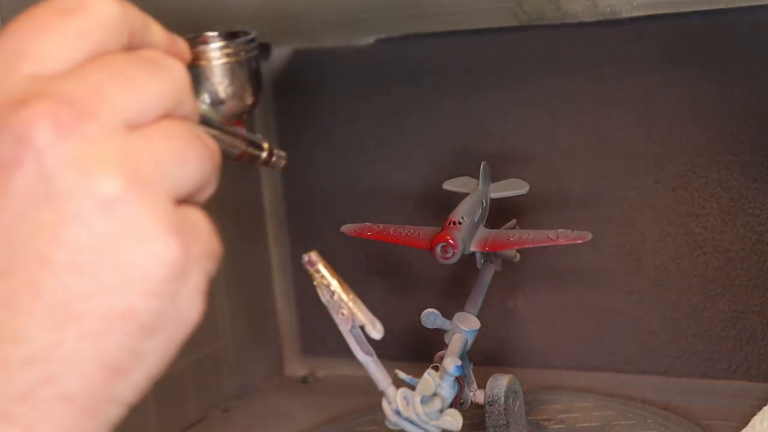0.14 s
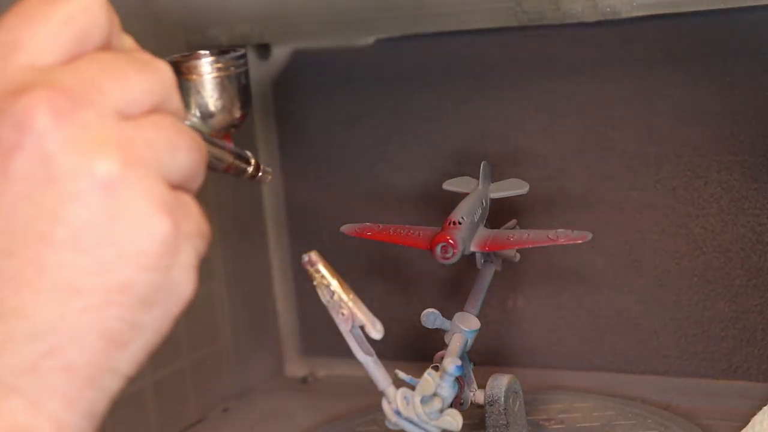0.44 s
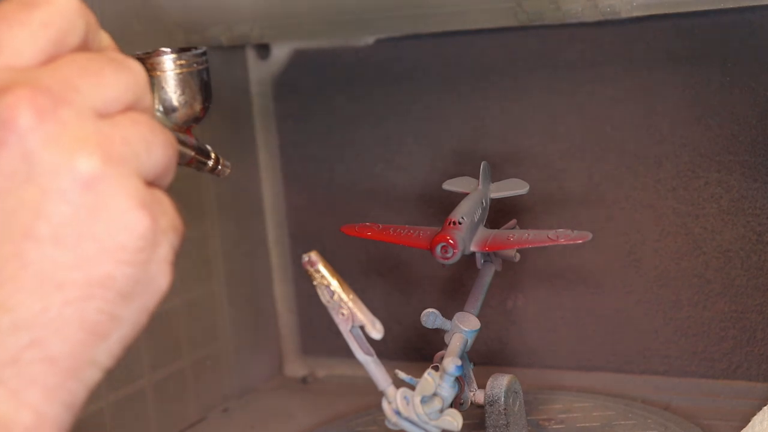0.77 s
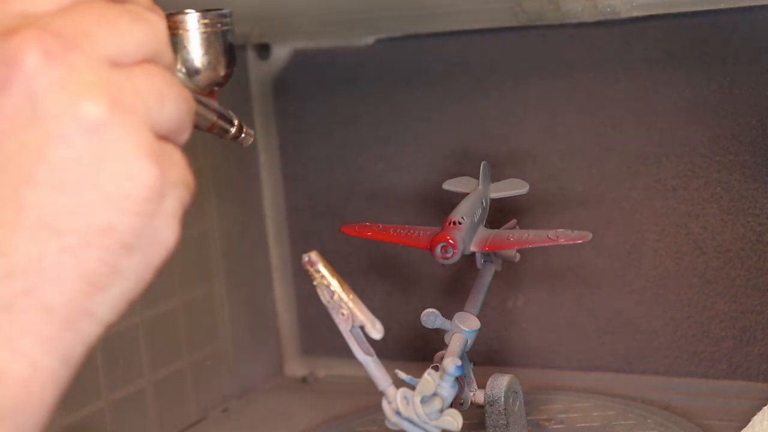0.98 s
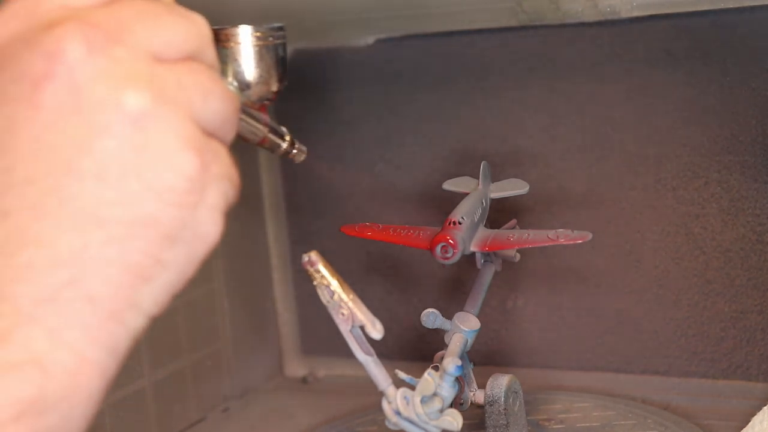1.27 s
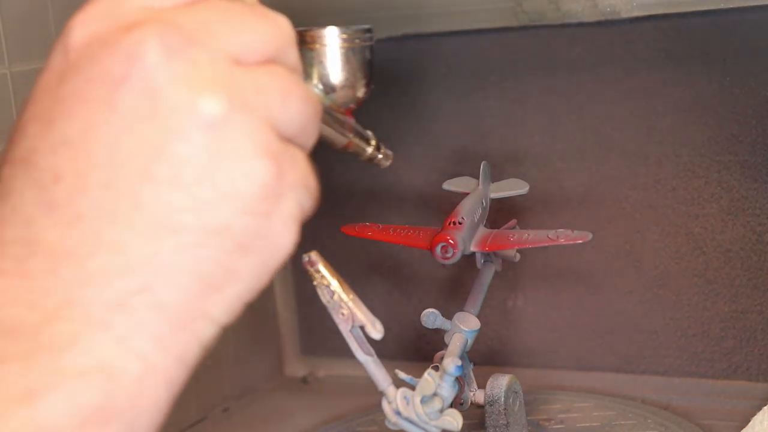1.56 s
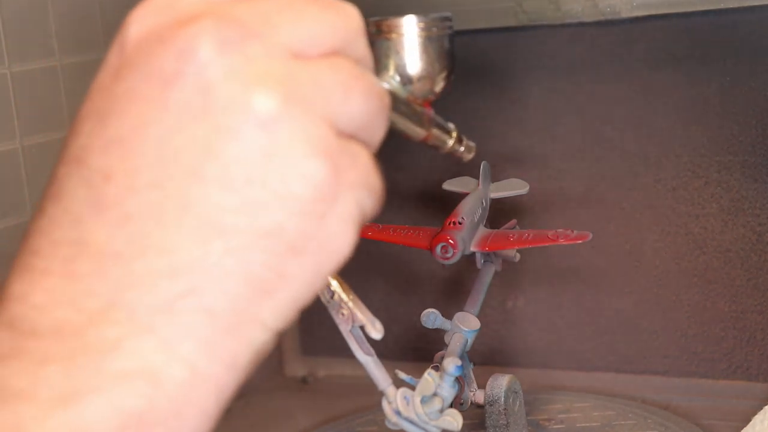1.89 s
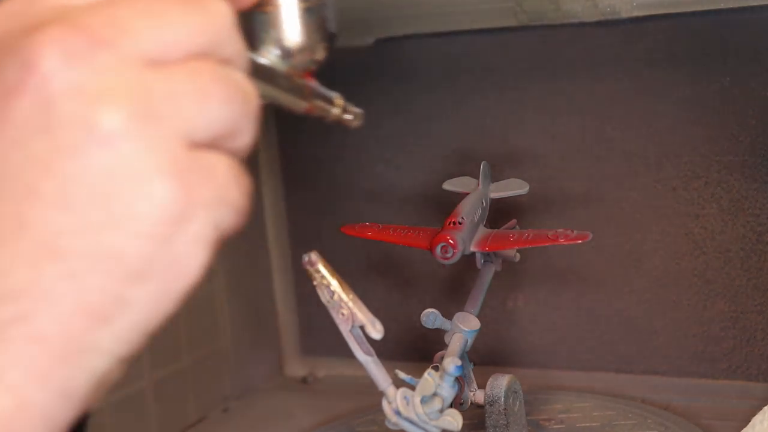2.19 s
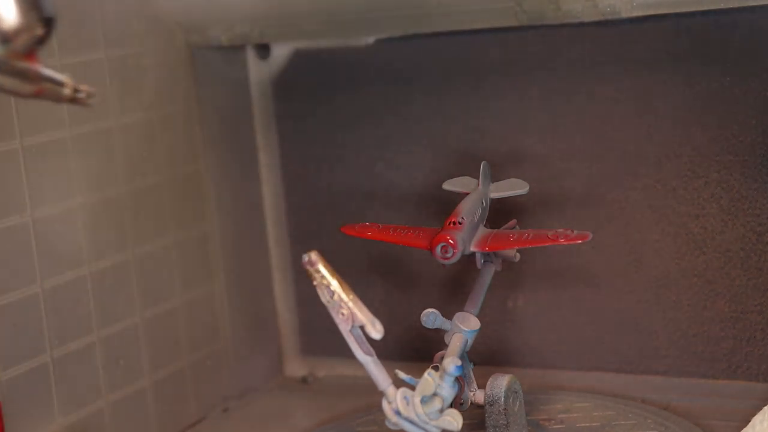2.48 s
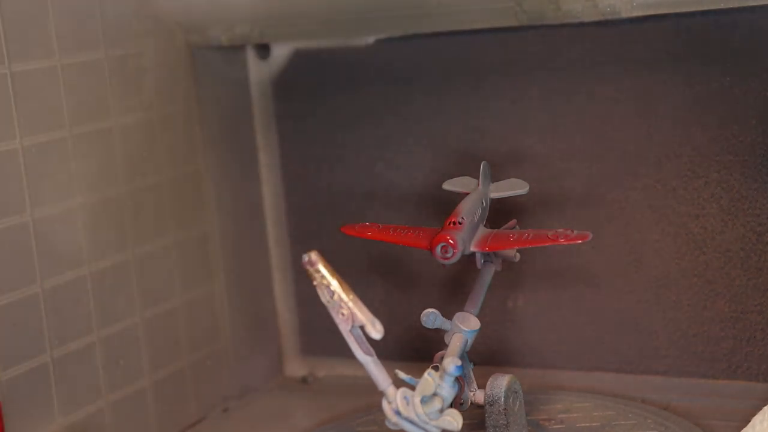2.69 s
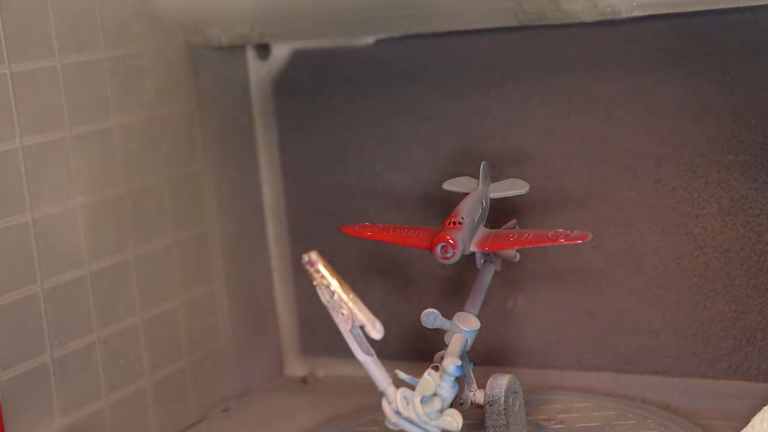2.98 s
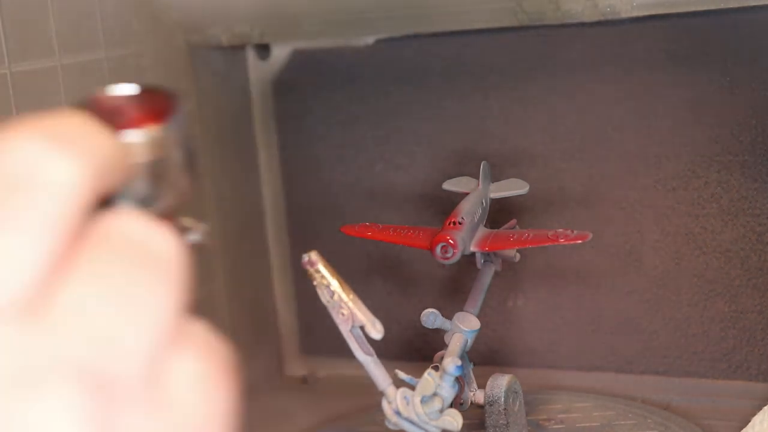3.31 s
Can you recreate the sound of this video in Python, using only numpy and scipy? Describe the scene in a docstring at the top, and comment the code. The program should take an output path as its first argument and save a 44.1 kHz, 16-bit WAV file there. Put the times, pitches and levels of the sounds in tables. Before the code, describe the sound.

An airbrush sprays bright, fluttering hiss from 0.3 to 0.9 s, then 1.1 to 2.1 s, each opening with a tiny puff, swelling quickly and stopping abruptly, with faint airy whistles inside. A much quieter compressor drones throughout, pulsing rapidly, with small dry metallic ticks, more frequent after 2.3 s. A thin high leak hiss remains and grows slightly to 3.4 s. Close mono microphone, small booth, faint low gust near 2 s.

```python
"""A small compressor chuffs, hums and ticks, and air leaks with a high narrow hiss; then an airbrush sprays twice.
Each spray is a puff of stored air, then jet turbulence (shaped noise) with faint whistles (narrow noise bands).
The compressor is noise with casing resonances, modulated once per turn; its valve ticks are struck modes.
The leak is three narrow bands of noise. Booth echoes colour the airbrush and leak; low gusts brush the one
microphone."""
import sys
import numpy as np
from scipy import signal
from scipy.fft import rfft, irfft
from scipy.io import wavfile

SR = 44100
rng = np.random.default_rng(int(sys.argv[2]) if len(sys.argv) > 2 else 0)


def store_wav(level_fs):
    """Save 16-bit WAV to argv[1]."""
    pcm = np.round(np.clip(np.atleast_2d(level_fs), -1, 1) * 32767)
    wavfile.write(sys.argv[1], SR, pcm.T.astype(np.int16))


N = 152145


def from_db(db):
    """Decibel law: level in dB to amplitude gain."""
    return 10 ** (np.asarray(db) / 20)


def rms_one(x):
    """Power normalisation: scale to unit rms."""
    return x / np.sqrt(np.mean(np.abs(x) ** 2) + 1e-20)


def in_time(rows, outside=None):
    """Linear interpolation: the columns after t/s, at every sample."""
    s, *columns = np.transpose(rows)
    t = np.arange(N) / SR
    return [np.interp(t, s, column, outside, outside) for column in columns]


def drift(rate_hz):
    """Low-passed random motion: noise through two equal poles at this rate, spread 1."""
    step = 40  # samples between drawn values
    r = np.exp(-2 * np.pi * rate_hz * step / SR)
    noise = rng.standard_normal(N // step + 2002)
    slow = signal.lfilter([1], [1, -2 * r, r * r], noise)[2000:]  # the filter has settled
    return np.interp(np.arange(N) / step, np.arange(len(slow)), rms_one(slow))


def coloured(spectrum):
    """Spectral shaping of white noise: falls 54 dB in the octave below the table, flat above it; rms 1."""
    hz, db = np.transpose(spectrum)
    log_hz = np.log(np.fft.rfftfreq(N, 1 / SR) + 1)
    shape_db = np.interp(log_hz, np.log([hz[0] / 2, *hz]), [db[0] - 54, *db])
    return rms_one(irfft(rfft(rng.standard_normal(N)) * from_db(shape_db), N))


def band(hz, half_hz):
    """Heterodyning: low-passed complex noise moved to a fixed or gliding centre, -6 dB at half_hz; rms 1."""
    r = np.exp(-2 * np.pi * half_hz / SR)
    noise = rng.standard_normal(N) + 1j * rng.standard_normal(N)
    slow = signal.lfilter([1], [1, -2 * r, r * r], noise)
    carrier = np.exp(2j * np.pi * np.cumsum(hz * np.ones(N)) / SR)
    return rms_one(np.real(slow * carrier))


def patchy(x, patchy_db):
    """Independent band modulation: overlapping slices at 700 Hz spacing swell and sink by themselves."""
    spectrum = rfft(x)
    slices = np.fft.rfftfreq(N, 1 / SR) / 700
    out = 0
    for k in range(25):
        one_slice = irfft(spectrum * np.clip(1 - abs(slices - k), 0, 1), N)
        out = out + from_db(patchy_db * drift(5.0)) * one_slice
    return out


# spectra of the bright jet and its lower hiss: (f/Hz, relative level per Hz/dB)
JET_SPECTRUM = [(2350, -30), (4000, -10.5), (5350, -6.5), (6090, -2), (9220, -2.5), (11800, -1.5),
                (13300, 1), (15600, -2.5)]
LOW_HISS_SPECTRUM = [(290, -39), (500, -16), (590, -8.5), (1080, -8), (1840, -2.5), (3020, -2.5),
                     (6000, -4), (7000, -25), (9100, -25), (15400, -120)]
# the lower hiss swells and sinks with the aim: (t/s, level against the jet/dB)
LOW_HISS_LEVEL = [(.3, -6.5), (.45, -10.5), (.65, -7.5), (.87, -10), (1.14, -7), (1.3, -10.5),
                  (1.57, -10.5), (1.8, -9.5), (1.95, -14), (2.07, -13.5)]
JET_PATCHY_DB, JET_FLUTTER_DB, JET_SPIT_DB = .9, 0.26, 1.0  # spreads


def spray():
    """Jet turbulence: bright hiss, lower hiss and whistles share the flow and its rapid flutter."""
    low_db, = in_time(LOW_HISS_LEVEL)
    hiss = coloured(JET_SPECTRUM) + from_db(low_db) * coloured(LOW_HISS_SPECTRUM)
    jet = patchy(hiss, JET_PATCHY_DB) + whistles()
    flutter_db = JET_FLUTTER_DB * drift(25.0) + JET_SPIT_DB * drift(137.0)
    return flow() * jet * from_db(flutter_db)


# each spray: (valve opens t/s, paint flows fully t/s, valve shuts t/s,
# level on opening/dB, at full flow/dB, at the end/dB), all before flutter
SPRAYS = [(0.294, .44, 0.8784, -48.5, -44, -45.5), (1.117, 1.244, 2.071, -50.5, -44.5, -44)]
OPEN_S, HESITATE_S, SHUT_DB_PER_S = 0.0026, 0.052, 1000


def flow():
    """Valve-controlled flow envelope: opens at once, hesitates, moves to full flow with paint, shuts fast."""
    jet = 0
    for opens, full, shuts, first_db, full_db, last_db in SPRAYS:
        db, = in_time([
            (opens - OPEN_S, first_db - 30),
            (opens, first_db),
            (opens + HESITATE_S, first_db),
            (full, full_db),
            (shuts, last_db),
            (shuts + 40 / SHUT_DB_PER_S, last_db - 40),
        ], -140)
        jet = jet + from_db(db)
    return jet


# whistling bands as the jet meets edges:
# (start t/s, end t/s, middle f/Hz, half width/Hz, level against the jet/dB)
WHISTLES = [(.40, .80, 13550, 220, -8), (.33, .56, 5800, 250, -14), (.36, .62, 12100, 220, -13),
            (.45, .8, 10000, 150, -20), (.72, .88, 7800, 400, -15), (1.3, 1.52, 6050, 250, -14),
            (1.515, 1.63, 6350, 600, -4.5), (1.5, 1.9, 11200, 200, -14), (1.64, 1.9, 13500, 400, -10),
            (1.87, 2.07, 12400, 250, -11), (1.85, 2.07, 7500, 300, -16), (1.25, 1.4, 14000, 350, -14),
            (1.2, 1.4, 12000, 200, -14), (.55, .76, 2450, 250, -20), (1.52, 1.62, 4200, 700, -13)]
WHISTLE_EDGE_S, WHISTLE_WANDER = 0.025, .006  # fade time; spread as a fraction of pitch


def whistles():
    """Edge tones as narrow-band noise: each fades in and out and wanders in pitch."""
    out = 0
    for start, end, hz, half_hz, db in WHISTLES:
        on, = in_time([(start - WHISTLE_EDGE_S, 0), (start, 1), (end - WHISTLE_EDGE_S, 1), (end, 0)])
        moving_hz = hz * (1 + WHISTLE_WANDER * drift(3.0))
        out = out + on * from_db(db) * band(moving_hz, half_hz)
    return out


# valve openings: (t/s, level/dB)
PUFFS = [(0.292, -48), (1.119, -50)]
# colour of a puff: (middle f/Hz, half width/Hz, relative level/dB)
PUFF_BANDS = [(7870, 900, 1), (12200, 1100, -1), (15500, 500, -7)]
PUFF_S, PUFF_FADE_S = .007, 0.0026  # steady part; time constant of the decay


def puffs():
    """Pressure release: stored air escapes in a short steady burst, then decays exponentially."""
    t = np.arange(N) / SR
    shape = 0
    for s, db in PUFFS:
        decay = np.exp(-np.clip(t - s - PUFF_S, 0, None) / PUFF_FADE_S)
        shape = shape + from_db(db) * (t > s) * decay
    return shape * sum(from_db(db) * band(hz, half_hz) for hz, half_hz, db in PUFF_BANDS)


# compressor drone: (t/s, base level/dB)
DRONE_LEVEL = [(0, -65.5), (.14, -62), (.3, -62.5), (2.06, -63), (2.12, -66.5), (2.3, -65), (2.6, -65.5),
               (2.87, -64.5), (3.1, -65.5), (3.45, -63.5)]
# its noise spectrum: (f/Hz, relative level per Hz/dB)
DRONE_SPECTRUM = [(41, -56), (70, -18), (198, -8), (298, -5.5), (382, -3.5), (437, -5), (536, -4.5),
                  (600, -0.5), (823, 0.5), (1030, -2), (1290, -2.5), (3340, -3), (7550, -11), (11900, -14),
                  (15600, -20)]
# casing resonances: (middle f/Hz, half width/Hz, mean level against the base/dB)
CASING_PEAKS = [(293.5, 52, -13.5), (447.5, 23, -14.5), (600, 29, -9.5), (735, 36, -10.5), (1638, 45, -13)]
# gain of the drone's treble: (t/s, level/dB)
DRONE_TREBLE = [(1.1, -1.5), (3.3, 1)]
# grainy bands: (t/s, base level/dB)
GRAINY_LEVEL = [(0, -75.5), (2.1, -76), (2.5, -79), (2.8, -70.5), (3.1, -73), (3.45, -71)]
TURNS_PER_S, TURN_AT_S, CHUFF_DB = 28.75, 2.336, 0.63  # CHUFF_DB: swell either side of the mean
PEAK_WAVER_DB, DRONE_PATCHY_DB = 1, 1.5  # spreads
BURBLE_DB, BURBLES_PER_S = 2.5, 18  # casing resonances and grain swell together in short lumps
HUM_HZ, HUM_DB = 59, -29  # against the base level
TREBLE_HZ = 2300
GRAIN_HZ, GRAIN_HALF_HZ = 1025, 40
HIGH_GRAIN_HZ, HIGH_GRAIN_HALF_HZ, HIGH_GRAIN_DB = 3320, 150, -3.5  # level against the lower grain


def drone():
    """Amplitude modulation by rotation: resonant noise and grain swell once per turn, over a low hum."""
    t = np.arange(N) / SR
    db, = in_time(DRONE_LEVEL)
    grainy_db, = in_time(GRAINY_LEVEL)
    treble_db, = in_time(DRONE_TREBLE)
    chuff_db = CHUFF_DB * np.cos(2 * np.pi * TURNS_PER_S * (t - TURN_AT_S))
    lumps_db = BURBLE_DB * drift(BURBLES_PER_S)

    peaks = 0
    for hz, half_hz, peak_db in CASING_PEAKS:
        peaks = peaks + from_db(peak_db + PEAK_WAVER_DB * drift(6.0)) * band(hz, half_hz)
    noise = from_db(3.0) * patchy(coloured(DRONE_SPECTRUM), DRONE_PATCHY_DB)
    body = noise + from_db(lumps_db) * peaks

    high_pass = signal.butter(1, TREBLE_HZ, "high", fs=SR, output="sos")
    treble = signal.sosfilt(high_pass, body)
    body = body + (from_db(treble_db) - 1) * treble

    high_grain = from_db(HIGH_GRAIN_DB) * band(HIGH_GRAIN_HZ, HIGH_GRAIN_HALF_HZ)
    grainy = band(GRAIN_HZ, GRAIN_HALF_HZ) + high_grain
    hum = from_db(db + HUM_DB) * np.sin(2 * np.pi * HUM_HZ * t)
    return from_db(db + chuff_db) * body + hum + from_db(grainy_db + chuff_db + lumps_db) * grainy


# loud valve ticks: (t/s, level before trim/dB, favoured f/Hz)
TICKS = [(0.073, -53, 4630), (0.11, -46, 4560), (0.1463, -44, 2850), (0.3514, -40, 4430),
         (0.945, -48, 3380), (1.0822, -47, 4710), (1.184, -45, 5190), (1.292, -41, 4620),
         (2.163, -56, 3280), (2.3338, -47, 3390), (2.372, -49, 4710), (2.4049, -45.5, 3400),
         (2.5096, -47.5, 5470), (2.5416, -51.5, 3380), (2.6832, -47.5, 4250), (2.7182, -49.5, 4640),
         (2.7557, -49, 5400), (2.855, -49.5, 3330), (2.9614, -53, 4770), (2.9934, -52, 3240),
         (3.0603, -51, 3220), (3.1708, -47, 3330), (3.2036, -46.5, 3300), (3.3099, -42, 5610),
         (3.3248, -44.5, 3420), (3.3444, -49.5, 5380)]
# modes of the valve plate: (f/Hz, relative level/dB, 60 dB decay time/s)
PLATE_MODES = [(597, -10.5, 0.044), (1000, -3, 0.015), (2540, 0.5, 0.0093), (3380, 1.5, 0.011),
               (3750, -1, 0.006), (4500, 5, 0.0096), (4900, 6.5, 0.0068), (5610, 7, 0.0051),
               (6420, 3, 0.0059), (6830, 2.5, 0.0068), (7700, -4, .004), (8900, 0, .003)]
TICK_TRIM_DB, FAVOUR_DB = -13.5, 5
BOUNCE_DB, BOUNCE_S = -3, .0014  # change per bounce; mean gap between bounces


def ticks():
    """Modal ringing: a click and three bounces strike the valve plate, with modes near one pitch favoured."""
    s, db, favoured_hz = np.transpose(TICKS)
    late = rng.uniform(.5, 1.5, (len(s), 3)).cumsum(axis=1)
    strike_times = [s, *(s + BOUNCE_S * late.T)]
    chance_db = rng.normal(0, 2, (len(s), len(PLATE_MODES), 4))
    out = 0
    for m, (hz, mode_db, t60) in enumerate(PLATE_MODES):
        clicks = np.zeros(N) + 1e-18
        near_db = FAVOUR_DB * np.exp(-((hz - favoured_hz) / 500) ** 2)
        for k, at in enumerate(strike_times):
            strike_db = db + TICK_TRIM_DB + mode_db + near_db + k * BOUNCE_DB + chance_db[:, m, k]
            clicks[(at * SR).astype(int)] += from_db(strike_db)
        r = from_db(-60 / (t60 * SR))
        w = 2 * np.pi * hz / SR
        ring = signal.lfilter([0, np.sin(w)], [1, -2 * r * np.cos(w), r * r], clicks)
        out = out + (-1) ** m * ring  # neighbouring modes have opposite sign
    return out


# main band of the leak, in four runs: (t/s, level before flutter/dB)
LEAK_LEVEL = [
    [(0.02, -72), (0.14, -66), (0.28, -69.5)],
    [(0.92, -70.5), (1.002, -73.5), (1.1, -73)],
    [(2.11, -78), (2.29, -69.5), (2.3, -69)],
    [(2.35, -70), (2.926, -66), (3.43, -63.5)],
]
# its pitch: (t/s, f/Hz)
LEAK_PITCH = [(0, 11950), (1.1, 12000), (2.2, 11900), (2.55, 12050), (2.95, 11900), (3.1, 11600),
              (3.2, 11850), (3.45, 11900)]
# upper and lower bands: (t/s, level against the main band/dB, f/Hz)
LEAK_UPPER = [(0, 2.5, 12800), (.9, 6, 12680), (1.1, 9, 12600), (2.2, -2, 12500), (2.7, -3, 12800),
              (3.1, -4, 12400), (3.17, -8, 13400), (3.45, -6, 13500)]
LEAK_LOWER = [(0, -7, 10000), (.3, -7, 10000), (1.1, -6, 10200), (2.2, -18, 10300), (2.9, -11, 10000),
              (3.05, -7, 10700), (3.45, -7, 10000)]
LEAK_HALF_HZ, UPPER_HALF_HZ, LOWER_HALF_HZ = 410, 420, 700
LEAK_ROUGH_DB = 1.3  # spread


def leak():
    """Narrow-band turbulence: main, upper and broader lower bands glide in pitch and flutter together."""
    db, = in_time(sum(LEAK_LEVEL, []))
    hz, = in_time(LEAK_PITCH)
    upper_db, upper_hz = in_time(LEAK_UPPER)
    lower_db, lower_hz = in_time(LEAK_LOWER)
    main = band(hz, LEAK_HALF_HZ)
    upper = from_db(upper_db) * band(upper_hz, UPPER_HALF_HZ)
    lower = from_db(lower_db) * band(lower_hz, LOWER_HALF_HZ)
    return from_db(db + LEAK_ROUGH_DB * drift(60.0)) * (main + upper + lower)


# gusts on the microphone: (middle t/s, half length/s, level/dB)
DRAUGHT = [(1.896, 0.015, -77), (2.0, 0.064, -68), (2.235, .025, -79)]


def draught():
    """Wind noise: spent air brushes the microphone with gusts of low-frequency noise."""
    t = np.arange(N) / SR
    gusts = sum(from_db(db) * np.exp(-((t - s) / half_s) ** 2) for s, half_s, db in DRAUGHT)
    band_pass = signal.butter(3, [64.5, 165], "band", fs=SR, output="sos")  # Hz
    return gusts * rms_one(signal.sosfilt(band_pass, rng.standard_normal(N)))


# reflections from the booth walls: (delay t/s, level/dB)
ECHOES = [(.0018, -23), (.0043, -14.5), (.0071, -17), (0.0126, -18)]


def booth(x):
    """Comb filtering: a few close echoes ripple the spectrum."""
    n = np.arange(N)
    return x + sum(from_db(db) * np.interp(n - s * SR, n, x, 0) for s, db in ECHOES)


def scene():
    """Superposition: all sources add at one microphone, the same in both channels."""
    mono = booth(spray() + puffs() + leak()) + drone() + ticks() + draught()
    return np.array([mono, mono])


RUMBLE_CUT_HZ, CUTOFF_HZ = 45, 15714


def record(dry):
    """Band limiting: deep rumble is filtered out and the top falls steeply by 60 dB."""
    high_pass = signal.butter(2, RUMBLE_CUT_HZ, "high", fs=SR, output="sos")
    dry = signal.sosfilt(high_pass, dry)
    slope = np.clip((np.fft.rfftfreq(N, 1 / SR) - CUTOFF_HZ - 10) / 80, 0, 1)
    return irfft(rfft(dry) * from_db(-60 * slope ** 2), N)


dry = scene()
out = record(dry)
store_wav(out)
```